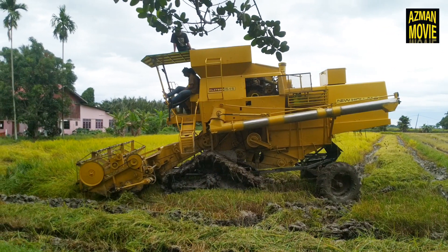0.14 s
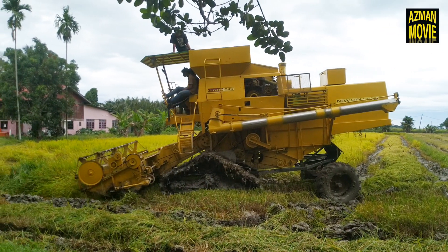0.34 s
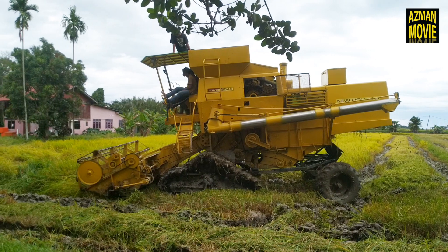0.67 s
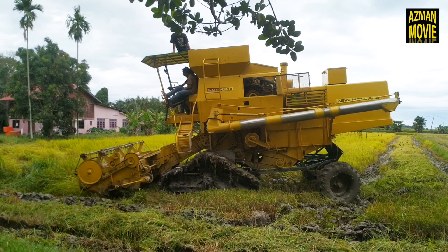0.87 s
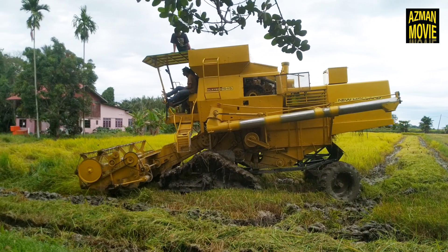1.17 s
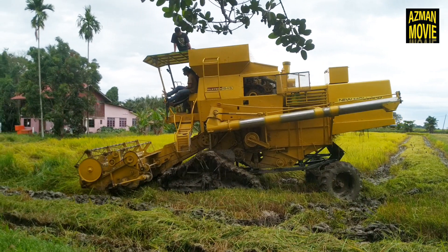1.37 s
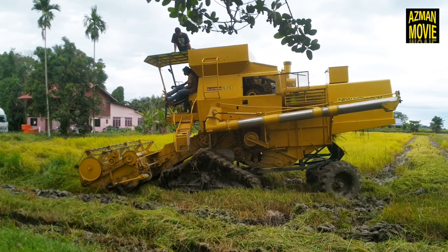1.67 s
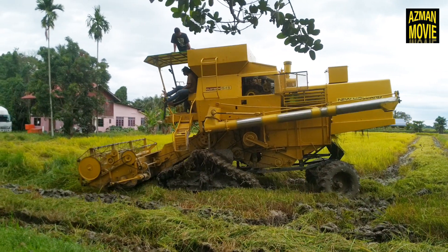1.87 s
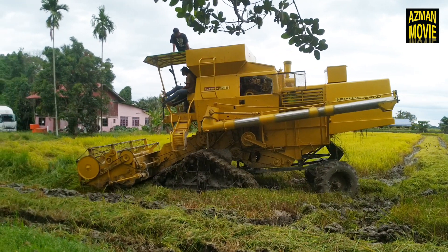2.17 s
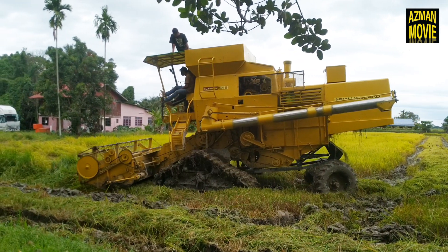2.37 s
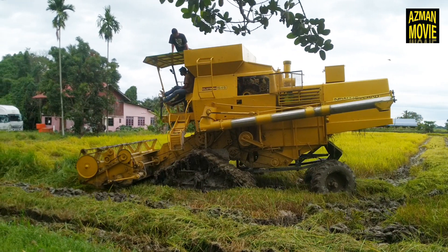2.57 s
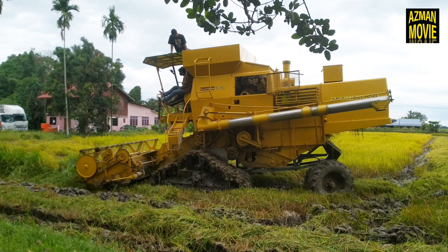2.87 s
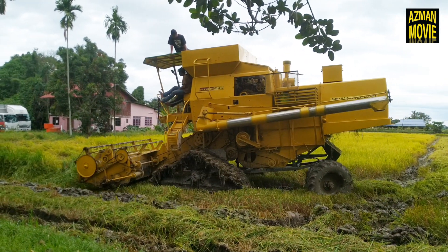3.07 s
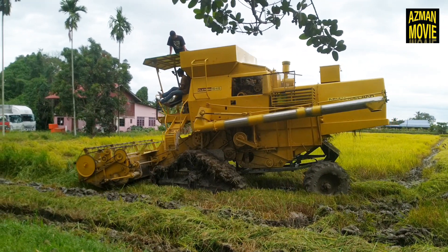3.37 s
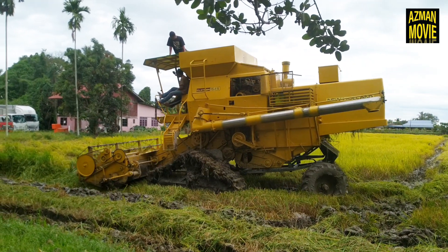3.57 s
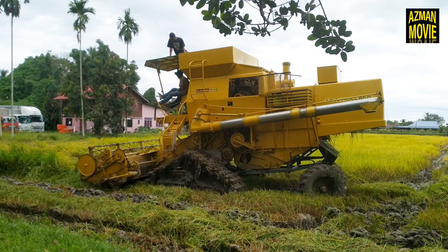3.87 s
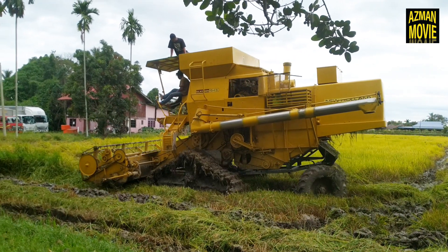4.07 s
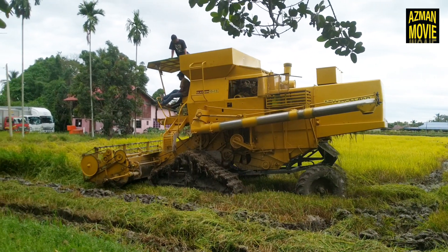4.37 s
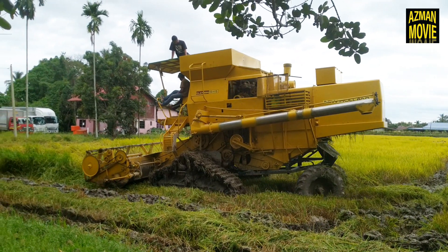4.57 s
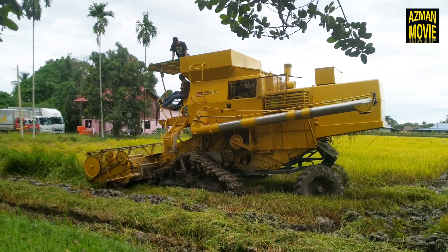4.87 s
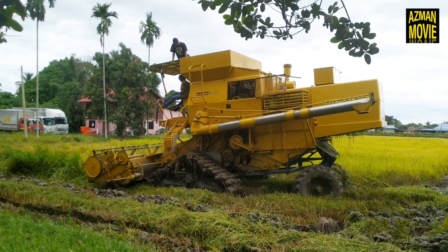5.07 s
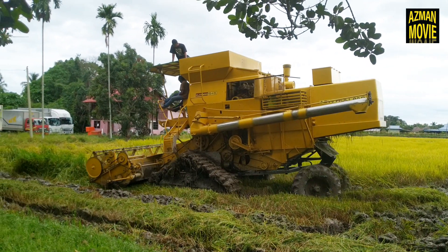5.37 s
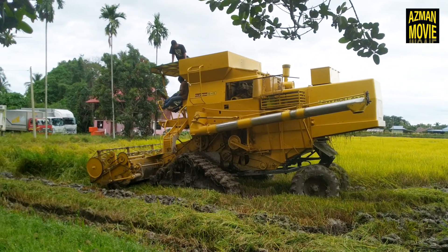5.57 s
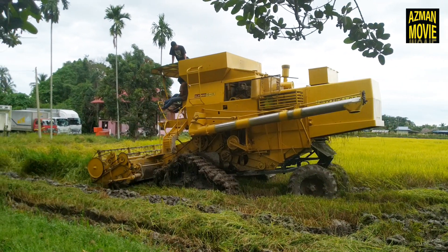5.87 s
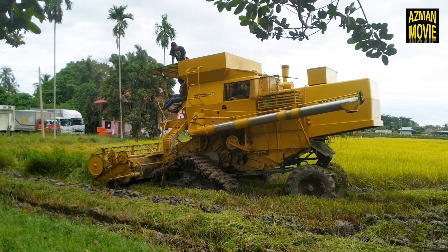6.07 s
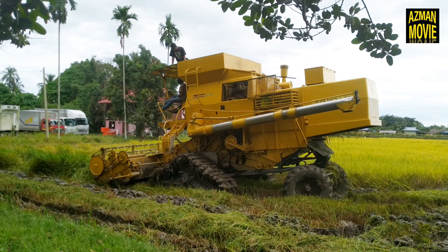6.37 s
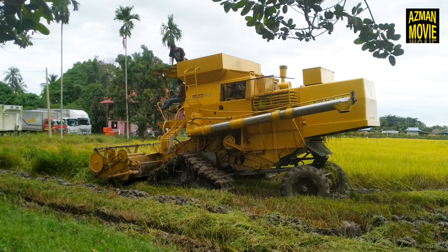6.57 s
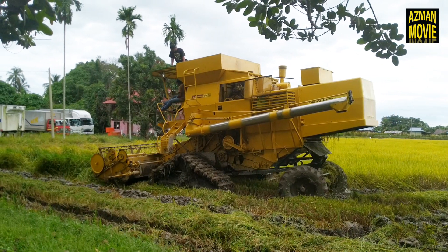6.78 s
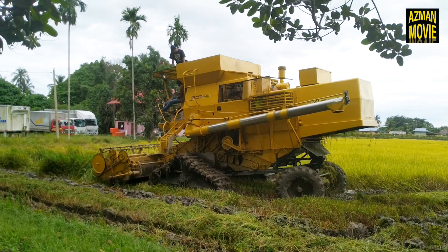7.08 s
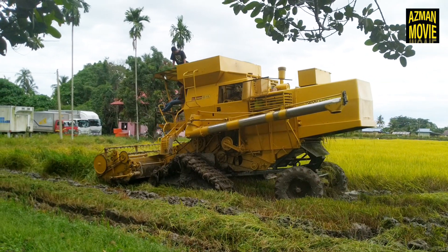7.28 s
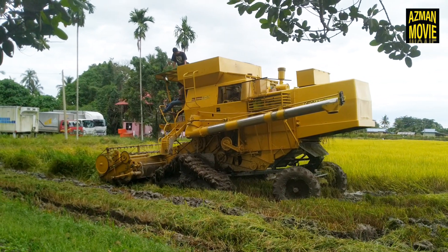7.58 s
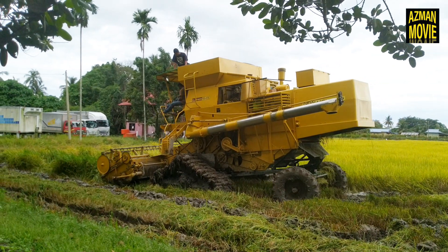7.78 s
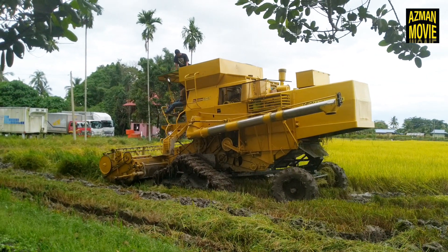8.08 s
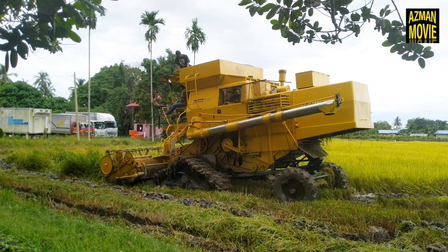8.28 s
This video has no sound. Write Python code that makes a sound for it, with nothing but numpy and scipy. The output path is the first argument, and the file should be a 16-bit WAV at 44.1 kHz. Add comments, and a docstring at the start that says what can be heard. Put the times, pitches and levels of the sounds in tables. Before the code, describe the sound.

Close, steady roar of a working harvester in a field: deep exhaust drone, rattling chains, dry straw hiss, swelling drum hum and occasional sharp clicks.

```python
"""In a rice field, a six-cylinder diesel combine harvester crawls past at governed speed.
Sharp dry clicks sound close by, with squeaking steel and dull thuds. Clinking steel is made of ringing
tones set off by random clicks; chattering chains and hissing straw are noise shaken by the engine.
The threshing drum hums in swells, and the exhaust drones as a stack of cosines.
One crankshaft, turning at a nearly steady speed, times the engine, drum, chains and straw."""
import sys
import numpy as np
from scipy import signal
from scipy.fft import rfft, irfft, next_fast_len
from scipy.io import wavfile

SR = 44100
rng = np.random.default_rng(int(sys.argv[2]) if len(sys.argv) > 2 else 0)


def materialize(psi):
    """Save the field psi as 16-bit PCM at rate SR to the path in sys.argv[1].

    A 1-D psi becomes a single channel; in a 2-D psi each row is a channel.
    """
    bounded = np.clip(np.atleast_2d(psi).T, -1, 1)
    quanta = np.round(bounded * 32767).astype(np.int16)
    wavfile.write(sys.argv[1], SR, quanta)


N = 372204
TIME = np.arange(N) / SR
CYLINDERS = 6

# The machine draws level with the listener. The pair gives the start and end of the move, both in seconds.
DRAWING_LEVEL = (1.5, 2.75)
# Then it pulls away. Again the start and end, both in seconds.
PULLING_AWAY = (5.7, 6.7)


def amp(db):
    """Turns decibels into a gain."""
    return 10 ** (np.asarray(db) / 20)


def unit(x):
    """Scales a signal to an rms of 1."""
    return x / np.sqrt(np.mean(x ** 2) + 1e-20)


def curves(rows):
    """Draws straight lines between a table's rows, giving each column at every sample."""
    seconds, *columns = np.transpose(rows)
    return [np.interp(TIME, seconds, column) for column in columns]


def move(span):
    """Goes from 0 to 1 over a span of time."""
    return np.interp(TIME, span, [0, 1])


def hump(s, length):
    """Rises and falls smoothly with height 1, centred on time s."""
    return np.cos(np.pi * np.clip((TIME - s) / length, -.5, .5))


def read(points, hz):
    """Reads a spectrum table along a log-frequency axis."""
    f, value = np.transpose(points)
    return np.interp(np.log(hz + 1), np.log(f), value)


def filtered(x, gain):
    """Filters by a gain given as a function of frequency."""
    size = next_fast_len(N + 4096)
    return irfft(rfft(x, size) * gain(np.fft.rfftfreq(size, 1 / SR)), size)[..., :N]


def wander(rate_hz):
    """Drifts smoothly at random with rms 1, up to about the given rate."""
    hz = np.fft.rfftfreq(4096, 128 / SR)
    slow = irfft(rfft(rng.standard_normal(4096)) * np.exp(-(hz / rate_hz) ** 2))
    return unit(np.interp(np.arange(N) / 128, np.arange(4096), slow))


def add(mix, s, sound):
    """Mixes a sound in at time s."""
    part = mix[..., round(s * SR):][..., :sound.shape[-1]]
    part += sound[..., :part.shape[-1]]


def impacts(per_s, scatter_db):
    """Makes two trains of random clicks, mostly small, a few large."""
    size_db = scatter_db * np.minimum(rng.exponential(1, (2, N)), 4)
    size = amp(size_db) * rng.choice([-1, 1], (2, N))
    return unit(size * (rng.random((2, N)) < per_s / SR))


# Sharp dry clicks. Each row: start in seconds, peak level in dB, decay time in seconds.
CLICKS = [(.628, -13, .00006), (4.4977, -23, .00006), (5.5608, -23, .00004), (6.8309, -22, .00003),
          (7.0045, -19, .00005), (7.1212, -22, .00003), (7.4005, -13, 0.00043)]
# Knocks on the machine's body. Each row: start in seconds, pitch in Hz, starting level in dB,
# time to fade by 60 dB in seconds.
BODY_KNOCKS = [(5.04, 710, -21, .024), (7.3995, 468, -23.5, .028)]
# Brief wavering, rasping narrow tones, low and high.
# Each row: start in seconds, pitch in Hz, level in dB, length in seconds.
RASPING_TONES = [(0, 1128, -50, 0.62), (0.951, 4400, -53, 0.47), (0.947, 760, -43, 0.45),
                 (1.203, 2700, -47, .5), (1.4, 518, -45, 0.76), (2.1, 827, -41, 0.42), (2.45, 519, -43, .6),
                 (3.65, 525, -47, 0.56), (4.499, 2545, -49, 0.89), (5.703, 644, -45, 0.95),
                 (5.899, 1420, -43, 0.93), (7.217, 6550, -52, 0.15), (7.619, 4400, -43, .09),
                 (7.68, 6450, -50, .04), (8.02, 2610, -46.5, .44), (8.046, 3700, -47, 0.27)]
# Dull thuds. Each row: start in seconds, level in dB.
THUDS = [(1.564, -37), (3.501, -33), (4.474, -41)]


def field(waver=0.0223, rasp_db=5.0, thud_hz=36, thud_rise_s=0.019):
    """Dry clicks, knocks, brief rasping tones, and thuds as the machine drops into the ruts."""
    out, t = np.zeros((2, N)), np.arange(SR) / SR
    for s, db, decay in CLICKS:
        add(out, s, amp(db) * np.exp(-t / decay))
    for s, hz, db, t60 in BODY_KNOCKS:
        add(out, s, -amp(db - 60 * t / t60) * np.sin(2 * np.pi * hz * t))
    for s, hz, db, length in RASPING_TONES:
        rasp = unit(amp(rasp_db * wander(45)[:SR]))
        loudness = rasp * np.sin(np.pi * np.minimum(t / length, 1))
        for ear in out:
            # the pitch trembles separately at each ear
            turns = np.cumsum(hz * (1 + waver * wander(168)[:SR])) / SR
            add(ear, s, 2 * amp(db) * loudness * np.sin(2 * np.pi * turns))
    for s, db in THUDS:
        swell = (t / thud_rise_s) * np.exp(1 - t / thud_rise_s)
        add(out, s, amp(db) * swell * np.sin(2 * np.pi * thud_hz * t))
    return out


# Ringing of chain links and track shoes. Each row: pitch in Hz, level against the others in dB,
# time to fade by 60 dB in seconds.
STEEL_RINGS = [(760, 1.5, 0.097), (1420, -4, 0.037), (2100, 1.5, 0.031), (2700, -2.5, 0.021),
               (3560, -6, .04), (4350, -6, .04), (5520, -11.5, 0.021), (6230, -5, 0.048)]
# The rear swings round. Each row: time in seconds, share of the rear in view from 0 to 1.
REAR_IN_VIEW = [(0, 0), (2.5, 0), (4, 0), (5, 0.9), (6, 0.4), (7.3, 0.86), (8.44, 0.6)]


def tracks(level_db=-47, per_s=22, growth_db=3):
    """Links and shoes clink at random, more plainly as the rear comes round."""
    t = np.arange(4096) / SR
    out = np.zeros((2, N))
    for hz, db, t60 in STEEL_RINGS:
        # four slightly different tones near each pitch
        tones = np.sin(2 * np.pi * hz * rng.uniform(0.96, 1.05, (4, 1)) * t).sum(0)
        ring = amp(db - 60 * t / t60) * tones
        out += signal.oaconvolve(impacts(per_s, 3.6), ring[None], axes=1)[:, :N]
    each_ear = unit(out + 0.25 * out[::-1])  # a little of each side reaches the other
    return each_ear * amp(level_db + growth_db * curves(REAR_IN_VIEW)[0])


def reflections(x, count=5, strength=.11):
    """Echoes off the ground and the steel flanks; their delays drift with the motion and ripple the colour."""
    out, samples = x.copy(), np.arange(N)
    # each echo: delay in seconds, drift in seconds per 2 seconds, gap between the ears in seconds
    echoes = rng.uniform([.002, -.0007, -.0002], [.022, .0007, .0002], (count, 3))
    for delay, drift, gap in echoes:
        for ear in range(2):
            late = SR * (delay + drift * TIME / 2 + ear * gap)
            out[ear] += strength * np.interp(samples - late, samples, x[ear])
    return out / np.sqrt(1 + count * strength ** 2)


# How alike left and right are. Each row: frequency in Hz, likeness from -1 (opposite) to 1 (the same).
EAR_LIKENESS = [(60, .995), (200, .995), (300, .985), (640, .82), (1410, .52), (3100, .34), (6820, .1),
                (15000, -.13)]


def spread(pair, spectrum):
    """Colours two unrelated signals and blends them: bass arrives alike, treble diffuse."""
    def same(hz):
        return np.clip(read(EAR_LIKENESS, hz), -1, 1)
    mid = filtered(pair[0], lambda hz: amp(read(spectrum, hz)) * np.sqrt(1 + same(hz)))
    side = filtered(pair[1], lambda hz: amp(read(spectrum, hz)) * np.sqrt(1 - same(hz)))
    return np.array([mid + side, mid - side]) / np.std(mid)


# Combustion knock. One entry per cylinder, in firing order: strength in dB against the others.
CYLINDER_KNOCK = [-37, -7, -16, -2, -1, -0.5]
# The governor holds the speed, sagging a little under load.
# Each row: time in seconds, firings per second.
FIRING_RATE = [(0, 104.8), (.7, 104.8), (2.1, 104.3), (2.85, 103.7), (3.3, 104.2), (4.4, 104.7),
               (6.6, 103.6), (7.2, 104.05), (7.85, 102.75), (8.44, 102.45)]


def knocking(cycle, depth, decay, lag, repeat):
    """Noise bursts at each firing, each cylinder with its own strength; a share recurs every cycle."""
    firings = cycle * CYLINDERS - lag  # decay and lag count in firings
    strength = amp(CYLINDER_KNOCK)[np.floor(firings).astype(int) % CYLINDERS]
    burst = strength * np.exp(-(firings % 1) / decay)
    size = round(SR * CYLINDERS / FIRING_RATE[0][1])
    place = (cycle % 1 * size).astype(int)
    turn = np.pi * TIME / TIME[-1] * 2  # the recurring pattern changes as the machine passes
    first, second = rng.standard_normal((2, 2, size))[:, :, place]
    recurring = np.cos(turn) * first + np.sin(turn) * second
    grain = rng.standard_normal((2, N)) + repeat * recurring
    return unit(np.sqrt(1 + depth * burst ** 2) * grain)


# Tone colours of the gas rush, engine body, chains and straw.
# In all four, each row: frequency in Hz, strength in dB against the rest of that colour.
RUSH_COLOUR = [(15, -17), (30, -21), (48, -10), (70, 0.5), (115, -1), (165, -0.5), (200, 9), (240, -1),
               (300, -5), (325, 1), (370, -8), (450, -16), (700, -50), (2000, -55)]
BODY_COLOUR = [(200, -39), (380, -6), (450, -7.5), (515, 1), (580, -1.5), (660, -1), (780, 0), (900, -2),
               (990, -3.5), (1070, -8.5), (1300, -10.5), (2000, -25), (6000, -65)]
CHAIN_COLOUR = [(500, -31), (1000, -4), (1250, -0.5), (1550, -0.5), (1800, -2), (2150, -3), (2400, -5),
                (2750, -4.5), (3300, -9.5), (3850, -13), (4200, -13.5), (5000, -23), (7000, -39.5),
                (12000, -44)]
STRAW_COLOUR = [(2000, -12), (4200, -3.5), (5100, -3.5), (5800, -2), (6500, -6.5), (7400, -11.5),
                (8400, -13.5), (9200, -5), (10500, -1), (11800, 2), (13000, 2.5), (14300, -2), (15700, -7)]
# Bands that grow stronger or weaker in the later, rear-view tone colour.
# Each row: frequency in Hz, width in Hz, dB gained with the rear in full view.
REAR_BANDS = [(420, 87, -6), (513, 56, -5), (710, 40, 3.5), (1400, 350, 1.2), (1870, 150, -4.5),
              (2600, 150, 0), (4400, 400, 1), (6400, 720, 1)]
# Crop flowing through the machine. Each row: time in seconds, change of the straw hiss in dB.
CROP_FLOW = [(0, .8), (.8, 0.9), (1.35, 2.4), (2.8, -1.5), (3.65, -1.2), (4.6, -0.1), (6, -0.05),
             (7.1, 1.3), (8.44, 0.5)]
# The exhaust rush surges briefly. Each row: time of the peak in seconds, dB gained, length in seconds.
RUSH_SURGES = [(1.683, 3.5, .8), (6.85, 3.5, 1.6)]


def machinery(cycle, repeat=.26):
    """Gas rush, knock, chains and straw, shaken in step with the engine; chains and straw follow the crop."""
    flow = curves(CROP_FLOW)[0]
    surge_db = sum(db * hump(s, length) for s, db, length in RUSH_SURGES)
    rush_db = -27.5 - 2.5 * move(DRAWING_LEVEL) - 1.3 * move(PULLING_AWAY) + surge_db
    body_db = -33 - 2 * move(DRAWING_LEVEL) + 0.54 * wander(25)
    chain_db = -37.5 + 0.69 * flow + 0.85 * wander(33)
    straw_db = -43.4 + flow + 0.76 * wander(13)

    # bursts in step with the engine, plus loose random clicks
    rush_noise = knocking(cycle, 1.7, 0.21, -0.16, 0)
    body_noise = knocking(cycle, 1.7, .4, -0.13, repeat) + 0.43 * impacts(500, 2.6)
    chain_noise = knocking(cycle, 1.0, 0.73, -0.24, repeat) + 0.45 * impacts(600, 2.3)
    straw_noise = knocking(cycle, 2.0, 0.6, -0.47, 0) + 0.32 * impacts(1500, 4.8)

    rush = spread(rush_noise, RUSH_COLOUR) * amp(rush_db)
    body = spread(body_noise, BODY_COLOUR) * amp(body_db)
    chains = spread(chain_noise, CHAIN_COLOUR) * amp(chain_db)
    straw = spread(straw_noise, STRAW_COLOUR) * amp(straw_db)
    sound = reflections(body + chains) + straw

    def rear_gain(hz):
        return sum((amp(db) - 1) * np.exp(-((hz - f) / w) ** 2) for f, w, db in REAR_BANDS)
    return rush + sound + curves(REAR_IN_VIEW)[0] * filtered(sound, rear_gain)


# Wads of crop load the threshing drum.
# Each row: time of the peak in seconds, added hum in dB, length in seconds.
CROP_WADS = [(0.384, -37, .8), (.96, -33, 0.27), (1.42, -27, 0.55), (2.032, -26, 0.85), (2.55, -33, 0.91),
             (4.5, -33.5, 1.5), (5.62, -37, .35)]


def drum(cycle, idle_db=-44, ratio=3.95, octave_db=-9, whine_db=-51, whine_ratio=37.25):
    """The belt-driven drum hums louder with each wad, its octave growing with load; a gear whines faintly."""
    # both ratios count vibrations per engine cycle
    level = amp(idle_db) + sum(amp(db) * hump(s, length) for s, db, length in CROP_WADS)
    angle = 2 * np.pi * ratio * cycle + .5 * wander(1.0)
    octave = amp(octave_db) * level / level.max() * np.sin(2 * angle)
    whine = amp(whine_db + 0.98 * wander(1.5)) * np.sin(2 * np.pi * whine_ratio * cycle)
    return np.sqrt(2) * (level * (np.sin(angle) + octave) + whine)


# Slow swell of the firing note's octave, which the other strong tones share or oppose.
# Each row: time in seconds, change in dB.
OCTAVE_SWELL = [(0, -1.5), (.6, 0.3), (2.3, -1), (2.8, 4), (3.3, -1), (3.65, 0.3), (4.5, -6.5), (5.4, -5),
                (6.2, 0), (7.3, -1.1), (7.8, 2.5), (8.44, 3.2)]
# A few strong tones, on and between multiples of the firing note.
# Each row: multiple of the engine cycle, level in dB, share of the swell,
# dB gained drawing level, dB gained pulling away.
STRONG_TONES = [(6, -21, -0.039, 3.5, .3), (9, -25.5, -0.22, -0.6, -5.5), (11, -27.5, -0.74, -3, 1.5),
                (12, -22.5, 1.08, 1, -1), (15, -30, 0.36, -2, 1.2), (18, -33.5, 1.02, -1, -1)]
# Fainter exhaust tones at multiples of the engine cycle. Each row: multiple, level in dB.
FAINT_TONES = [(2, -55), (3, -47), (4, -49), (5, -44), (7, -67), (8, -38), (10, -51), (13, -35),
               (14, -45.5), (16, -40), (17, -45.5), (19, -54), (21, -49), (22, -52.5), (24, -54),
               (28, -53.5), (29, -56.5), (30, -58.5), (41, -59), (47, -62), (57, -59)]


def exhaust(cycle, jitter=0.0013, flutter_db=.5, sway_db=0.25):
    """Strong and fainter tones at multiples of the engine cycle add a surge each cycle, smeared by the pipe."""
    angle = 2 * np.pi * (cycle + jitter * wander(25))
    swell, tones = curves(OCTAVE_SWELL)[0], []
    for k, db, share, level_db, away_db in STRONG_TONES:
        # of the strong tones, only those above the firing note are unsteady
        unsteady = (round(k) > CYLINDERS) * (flutter_db * wander(6.3) + sway_db * wander(2.1))
        passing = level_db * move(DRAWING_LEVEL) + away_db * move(PULLING_AWAY)
        tones.append((round(k), db + share * swell + passing + unsteady))
    tones += [(round(k), db) for k, db in FAINT_TONES]
    out = np.zeros(N)
    for order, db in tones:
        # the pipe holds low notes back, so each surge chirps down through its resonance
        smear = .14 * (order - 2 * CYLINDERS) ** 2 - 2.7
        lead = np.pi / 3 * (order == CYLINDERS)  # the firing note runs a little ahead
        # tones between multiples of the firing note slide more as the paths round the machine change
        drift = (.75 if order % CYLINDERS else .1) * wander(.9)
        out += amp(db) * np.cos(order * angle + smear + lead + drift)
    return np.sqrt(2) * out


# The machine stands a little to the left. Each row: frequency in Hz, left minus right in dB.
LEFT_LEAN = [(60, 1), (110, 1.86), (200, 1.5), (380, 2.1), (700, 2.8), (1290, 5.4), (2380, 6.4),
             (4400, 1.1), (8120, 0.5), (15000, 0.5)]


def scene():
    """One crankshaft drives engine, drum, chains and straw; every sound leans to the left."""
    cycle = np.cumsum(curves(FIRING_RATE)[0]) / SR / CYLINDERS
    sound = field() + tracks() + machinery(cycle) + drum(cycle) + exhaust(cycle)
    return filtered(sound, lambda hz: amp(np.outer([.5, -.5], read(LEFT_LEAN, hz))))


def record(dry, edge_hz=15800):
    """The microphone's band limit takes away the highest treble."""
    lowpass = signal.firwin(801, edge_hz, window=("kaiser", 9), fs=SR)
    return signal.oaconvolve(dry, lowpass[None], "same")


dry = scene()
out = record(dry)
materialize(out)
```